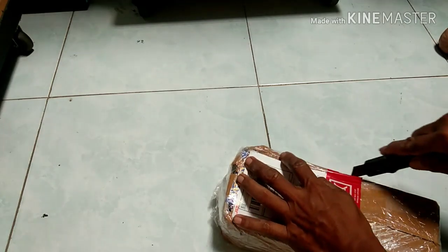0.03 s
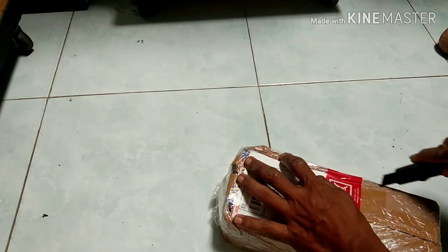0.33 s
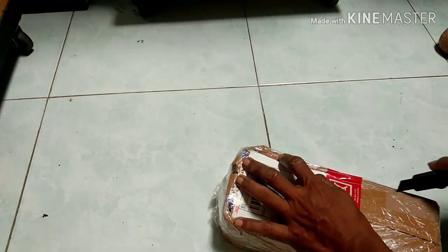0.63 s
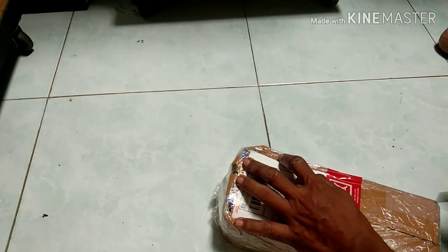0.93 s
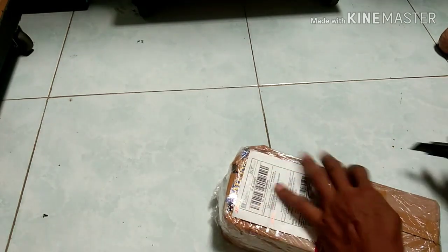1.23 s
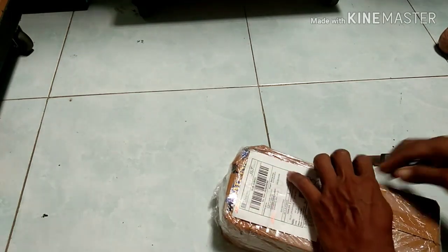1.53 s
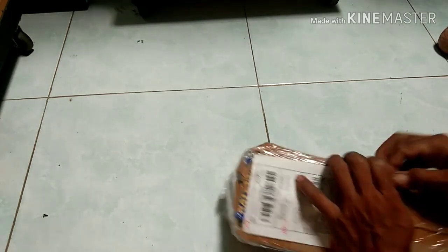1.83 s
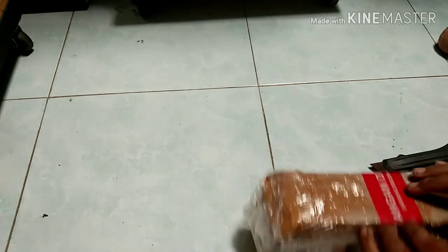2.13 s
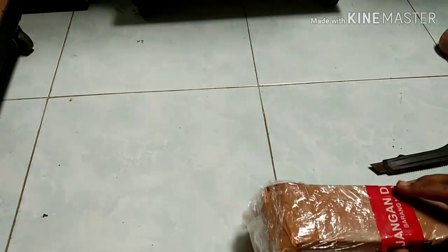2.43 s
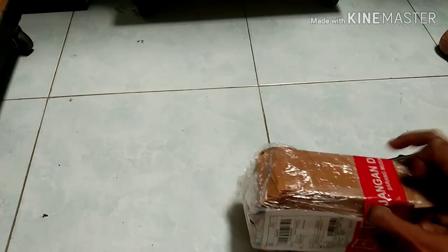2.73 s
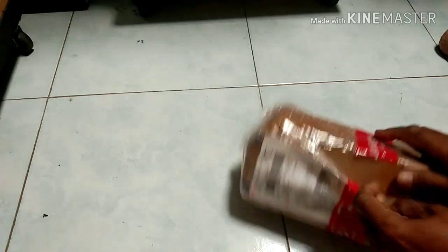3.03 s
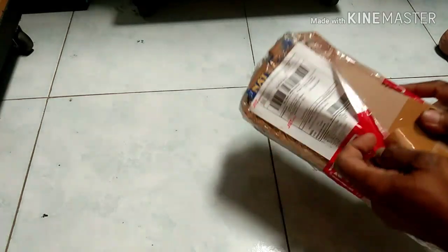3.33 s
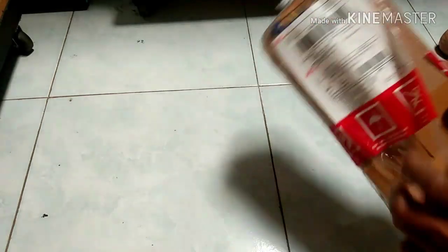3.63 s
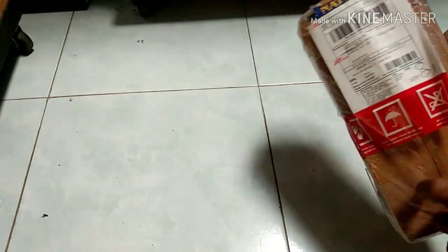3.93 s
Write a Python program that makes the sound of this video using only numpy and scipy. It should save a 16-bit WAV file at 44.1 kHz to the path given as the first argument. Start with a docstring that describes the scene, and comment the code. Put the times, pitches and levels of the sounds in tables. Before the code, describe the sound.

A parcel's plastic wrap crinkles, close up in a small hard room over a faint hum. For the first second a cutter's slider ratchets in quick clicks; at 1.4 seconds the cutter drops and rattles on tiles. Scattered crinkles start at 1.7, with one dull knock of the box at 2.15 and soft bumps. The film crackles loudest from 3 to 3.4, then rasps briefly near 3.7.

```python
"""A snap-off cutter's slider ratchets over its notches for a second, then the cutter is dropped and
rattles on a tiled floor. A cardboard parcel in taut plastic film is tipped over and knocks on the tiles
just after two seconds. It is picked up, and the film snaps and crinkles under the fingers, with one
short rasp near the end. All of it is close to the microphone in a small hard room, over a low hum,
with a limiter on the sharpest peaks."""
import sys
import numpy as np
from scipy import signal
from scipy.fft import rfft, irfft, next_fast_len
from scipy.io import wavfile
from scipy.ndimage import uniform_filter1d, minimum_filter1d, map_coordinates

SR = 44100
rng = np.random.default_rng(int(sys.argv[2]) if len(sys.argv) > 2 else 0)


def generate_wav(signal):
    """Clip the signal to [-1, 1] and save it as 16-bit WAV at the path in sys.argv[1]."""
    frames = np.transpose(np.atleast_2d(signal))
    scaled = np.clip(frames, -1, 1) * 32767
    pcm = np.round(scaled).astype(np.int16)
    wavfile.write(sys.argv[1], SR, pcm)


N = 176400
T = np.arange(4096) / SR  # time within one short burst [s]
LEVEL_WINDOW_S = .005  # a hit's level is its energy spread over this time


# the cutter's hits on the tiles: (time [s], clack level [dB], knock level [dB], length [s])
BOUNCES = [(1.3915, -10.5, -21, 0.005), (1.4027, -8.5, -29.5, .014), (1.499, -17.5, -32.5, 0.012),
           (1.5222, -19, -42, 0.018), (1.5628, -15.5, -38, 0.0076), (1.5713, -23.5, -36, 0.019),
           (1.6005, -18, -35, 0.026), (1.648, -47, -64, 0.0036), (1.662, -31.5, -55, 0.033)]
# EQ of the bright clack and of the duller knock under it: (frequency [Hz], gain [dB])
CLACK_EQ = [(700, -46), (1500, -11), (2300, 1.5), (3200, 0), (4400, 2.5), (6200, 0), (7500, -4),
            (9000, -22.5), (12000, -34), (15000, -48)]
KNOCK_EQ = [(80, -32), (250, -18), (500, -2.5), (900, -12), (1400, 0), (2200, 2), (4000, -12)]
# the cutter's ringing modes: (frequency [Hz], level [dB], decay t60 [s])
CUTTER_MODES = [(1620, -10, .06), (2345, -1, 0.12), (2960, -10, .1), (4040, 10, 0.054), (4610, 4, 0.087),
                (6100, 1, 0.14)]

def dropped_cutter(knock_db=-1, ring_db=-12, brighter=0.6, hold=0.14):
    """The cutter lands on both ends and rattles to rest; harder hits are brighter."""
    out = np.zeros(N)
    mean_db = np.mean([row[1] for row in BOUNCES])
    t = np.arange(SR // 4) / SR
    for s, db, low_db, length in BOUNCES:
        tilt = brighter * (db - mean_db)  # dB per octave
        eq = [(hz, gain + tilt * np.log2(min(hz, 7000) / 4000)) for hz, gain in CLACK_EQ]
        add(out, s, burst(hold_decay(length, hold), eq, db, vary_db=4.2))
        add(out, s, burst(hold_decay(length, hold), KNOCK_EQ, low_db + knock_db, vary_db=3))
        ring = np.zeros(len(t))
        for hz, gain, t60 in CUTTER_MODES:
            decay = amp(gain + rng.normal(0, 2.5) - 60 * t / t60)
            ring += decay * np.sin(2 * np.pi * hz * (1 + rng.normal(0, .012)) * t)
        add(out, s, at_level(ring, db + ring_db))
    return room(out, wet_db=-4.5)


# the film buckles: (time [s], snap level [dB], cardboard level [dB])
CREASES = [(1.6943, -33.0, -56), (1.7295, -32.5, -42), (1.7347, -27.5, -43.5), (1.7733, -19.5, -35.5),
           (1.7866, -21, -40), (1.8012, -25.0, -49), (1.8201, -23, -42.5), (1.9768, -39.5, -51),
           (2.0105, -19, -39.5), (2.0739, -40, -59), (2.1478, -28, -35.5), (2.1703, -32, -38),
           (2.2116, -37.5, -41.0), (2.4448, -41, -58), (2.4564, -34, -61), (2.5011, -28.5, -41.0),
           (2.515, -29, -44), (2.533, -22.0, -35.5), (2.542, -20.5, -34.5), (2.5538, -25, -36),
           (2.7049, -36.5, -49), (2.7255, -34.5, -43), (2.869, -43, -51), (2.9992, -26.0, -32),
           (3.0306, -29.5, -49), (3.0365, -26.5, -40), (3.047, -25.0, -35), (3.0742, -18.5, -29.5),
           (3.0802, -19.5, -26), (3.1091, -16, -22), (3.1183, -15.5, -24.5), (3.1317, -18.5, -24.5),
           (3.1717, -15.5, -28), (3.217, -15.0, -18), (3.2317, -11.5, -21.5), (3.2396, -16.5, -28),
           (3.2539, -12.5, -21.5), (3.261, -20, -23.5), (3.2682, -11, -26.0), (3.2813, -12, -22),
           (3.2961, -10.5, -19.5), (3.303, -9, -21), (3.3178, -14.5, -18), (3.3786, -24.0, -51),
           (3.3852, -26.5, -47), (3.4595, -27, -55), (3.4717, -26.0, -53), (3.5966, -24, -36),
           (3.6143, -26, -54), (3.6331, -24, -43.0), (3.6761, -19, -34), (3.7323, -47, -55),
           (3.7945, -30, -54), (3.8141, -28, -47), (3.9052, -36.5, -69), (3.984, -31.5, -55)]
# EQ of the crisp film and of the hollow cardboard: (frequency [Hz], gain [dB])
FILM_EQ = [(700, -23), (1600, -7), (2500, -5.5), (3200, -2.5), (4000, -1), (4800, 2), (5600, 1.5),
           (6400, 3.5), (7300, -5), (8400, -16.5), (12000, -29), (15000, -25)]
CARDBOARD_EQ = [(50, -24), (140, 0), (280, -1), (480, -4), (610, -3), (740, -1.5), (950, 0.5), (1200, 3.5),
                (1700, -15), (2400, -8.5), (4500, -60)]

def film_snaps(typical_s=0.0051, typical_db=-25, growth_per_db=0.015, loose_brighter=0.33, hold=.2):
    """Creases pop and jolt the cardboard; loose film, barely touching the box, sounds brighter."""
    out, send = np.zeros(N), np.zeros(N)
    transient = 1 + 1.6 * np.exp(-np.abs(T - .0005) / .00015)
    for s, db, card_db in CREASES:
        length = typical_s * np.exp(growth_per_db * (db - typical_db))
        looseness_db = np.clip(db - card_db - 13, -10, 10)  # a typical snap is 13 dB over its cardboard
        tilt = loose_brighter * looseness_db  # dB per octave
        eq = [(hz, gain + tilt * np.log2(min(hz, 6000) / 4000)) for hz, gain in FILM_EQ]
        add(out, s, burst(hold_decay(length, hold) * transient, eq, db, vary_db=2.5))
        add(out, s, burst(hold_decay(1.5 * length, hold), CARDBOARD_EQ, card_db, vary_db=1.5))
        add(send, s, burst(T == 0, eq, db - 4))  # a click thrown all round, heard only as reverb
    return room(out, wet_db=-8.5) + room(send, wet_db=-6) - send


# the slider's notches: (time [s], click level [dB], thump level [dB], scrape length [s])
NOTCHES = [(0.025, -29.5, -30.5, 0.0043), (0.0703, -31, -23.5, 0.0026), (0.1133, -28.0, -20.5, 0.0029),
           (0.1747, -31.5, -33.5, 0.0022), (0.2253, -26.5, -32, 0.0024), (0.268, -32.5, -36.0, 0.0032),
           (0.3336, -37, -40, 0.0058), (0.3554, -31, -36.0, 0.0044), (0.3975, -31.5, -37.0, 0.0027),
           (0.4419, -37.5, -40.5, 0.0022), (0.478, -32, -33.5, 0.0022), (0.525, -30, -29.5, 0.0035),
           (0.6527, -32.5, -29.0, 0.0018), (0.6887, -37, -67, 0.0015), (0.7323, -32.5, -38, 0.0026),
           (0.7812, -29.5, -32.5, 0.0011), (0.8173, -30, -28.5, 0.0027), (0.8497, -30, -27.5, 0.0016),
           (0.8745, -30.5, -39, 0.0047), (0.9097, -29, -36.0, 0.0035), (0.9453, -28, -37.5, 0.00088),
           (0.977, -31.0, -40, 0.0061), (1.0147, -27, -37, 0.0045)]
# EQ of a notch click: (frequency [Hz], gain [dB])
NOTCH_EQ = [(300, -5.5), (700, -5.5), (1000, -7), (1400, -3.5), (2200, -7.5), (3300, -5.5), (4600, -2),
            (6100, 1), (7200, -1.5), (8300, -15), (10500, -22), (12500, -30), (15000, -19)]
# the plastic handle's modes: (frequency [Hz], level [dB], decay t60 [s])
HANDLE_MODES = [(217, 2.5, 0.039), (297.5, 2.5, .028)]
# the slider catches and its spring ticks: (time [s], level [dB])
CATCHES = [(0.1124, -28.5), (.1738, -30.5), (0.2229, -20.5), (.651, -34.5), (0.7782, -34.5), (0.9434, -36)]
# EQ of the steel spring: (frequency [Hz], gain [dB])
SPRING_EQ = [(500, -22), (1400, -15), (3000, -19), (4600, -6), (5200, -2), (6000, 6.5), (6700, -4),
             (7500, -15), (8400, -27.5), (12000, -41), (15000, -25)]

def slider(thump_db=5, tail_db=-15, tail_t60=0.11, attack_s=0.0019, lead_s=.01):
    """The spring scrapes up each notch and snaps in; the plastic handle thumps."""
    out = np.zeros(N)
    since_snap = T - lead_s
    tail = amp(tail_db - 60 * np.abs(since_snap) / tail_t60) * (since_snap > 0)
    for s, db, low_db, length in NOTCHES:
        width = length * np.where(since_snap < 0, 0.71, 1)  # rises faster than it falls
        scrape = np.exp(-np.abs(since_snap) / width)
        add(out, s - lead_s, burst(scrape + tail, NOTCH_EQ, db, vary_db=1.86))
        ring = np.zeros(len(T))
        for hz, gain, t60 in HANDLE_MODES:
            ring += amp(gain - 60 * T / t60) * np.sin(2 * np.pi * hz * (1 + rng.normal(0, 0.056)) * T)
        add(out, s, -amp(low_db + thump_db) * ring * (1 - np.exp(-T / attack_s)))
    for s, db in CATCHES:
        add(out, s, burst(hold_decay(0.0042, hold=.4), SPRING_EQ, db, vary_db=2.5))
    return room(out, wet_db=-10)


# soft bumps of hand and box: (time [s], level [dB])
BUMPS = [(1.403, -34), (2.013, -36.5), (2.451, -34.5), (2.621, -33), (2.712, -33), (2.753, -35.5)]
# EQ of a muffled bump: (frequency [Hz], gain [dB])
BUMP_EQ = [(30, -23), (90, -7), (160, -4), (320, -7.5), (500, -13), (1200, -25.5), (3000, -45)]

def box_knocks(tip_s=2.1486, tip_db=-4.5, tip_hz=480, width_s=0.00085):
    """The box tips onto the tiles with one dead knock; handling adds soft bumps."""
    since_tip = np.arange(N) / SR - tip_s
    pulse = np.exp(-np.minimum((since_tip / width_s) ** 2 / 2, 50))
    out = -amp(tip_db) * pulse * np.sin(2 * np.pi * tip_hz * since_tip + 0.33)
    bump_envelope = amp(-60 * T / 0.06) * (1 - np.exp(-T / 0.0027))
    for s, db in BUMPS:
        add(out, s, burst(bump_envelope, BUMP_EQ, db))
    return room(out, wet_db=-11.5)


# fader ride of the film's fine crinkle: (time [s], level [dB])
CRINKLE_FADER = [(0, -40.5), (.3, -62), (.6, -62.5), (.9, -52), (1.17, -51), (1.35, -61.5), (1.72, -46),
                 (1.9, -49.5), (2.2, -43), (2.38, -46), (2.46, -38.5), (2.56, -54), (2.63, -51),
                 (2.72, -41.5), (2.82, -51), (2.871, -42), (2.98, -41.5), (3.1, -45), (3.2, -36),
                 (3.3, -24), (3.39, -30), (3.54, -44), (3.62, -26), (3.77, -32.5), (3.86, -51.5),
                 (4, -41.5)]

def crinkle(ticks_per_s=420, spread_db=5, grain_t60=0.011, card_db=-11, trim_db=-2):
    """Many tiny creases tick as the hands work the film."""
    onsets = rng.random(N) < ticks_per_s / SR
    ticks = onsets * amp(spread_db * np.minimum(rng.exponential(size=N), 3.5))
    grains = signal.fftconvolve(ticks, amp(-60 * T / grain_t60))[:N] * rng.choice([-1., 1.], N)
    film = unit(colour(grains, FILM_EQ))
    cardboard = amp(card_db) * unit(colour(grains, CARDBOARD_EQ))
    fader_db = np.interp(np.arange(N) / SR, *np.transpose(CRINKLE_FADER))
    return room((film + cardboard) * amp(fader_db + trim_db), wet_db=-3.5)


# a finger slips on the film: (time [s], length [s], level [dB])
SLIPS = [(3.676, 0.03, -23)]
# peaky EQ of the rasp: (frequency [Hz], gain [dB])
SLIP_EQ = [(150, -28), (600, -10), (1100, -11.5), (1420, 7), (1800, -14.5), (2900, 2), (3300, -16),
           (3900, 1), (5100, -12), (5900, 7), (6600, 2.5), (8400, -20), (15000, -46)]

def finger_slip(grains_per_s=480, scatter_db=3, trim_db=-4, grain_t60=0.0015):
    """Skin sticks and slips on the film in a quick uneven rasp."""
    out = np.zeros(N)
    for s, length, db in SLIPS:
        for offset in np.arange(0, length, 1 / grains_per_s):
            jitter = rng.normal(0, 0.25) / grains_per_s
            grain_db = db + trim_db + rng.normal(0, scatter_db)
            add(out, s + offset + jitter, burst(amp(-60 * T / grain_t60), SLIP_EQ, grain_db))
    return room(out, wet_db=-10)


# reverb time of the small hard room: (frequency [Hz], decay t60 [s])
REVERB_T60 = [(150, 0.25), (600, 0.29), (2000, 0.33), (6000, 0.38), (9000, 0.2), (15000, 0.32)]
# EQ of the reverb: (frequency [Hz], gain [dB])
REVERB_EQ = [(100, -2.5), (600, 1), (1500, 0), (3000, -1), (6500, -1.5), (10000, 1.5)]

def room(x, wet_db, step_s=.25):
    """Dry sound plus diffuse reverb, crossfading to a fresh tail each step as things move."""
    out, t = x.copy(), np.arange(N) / SR
    for s in np.arange(0, N / SR + step_s, step_s):
        near = np.abs(t - s) < step_s
        if x[near].any():
            hz, age, noise = signal.stft(rng.standard_normal(SR // 2), SR, nperseg=256)
            decay = amp(along(REVERB_EQ, hz)[:, None] - 60 * age / along(REVERB_T60, hz)[:, None])
            attack = 1 - np.exp(-age / 0.0005)
            tail = signal.istft(noise * decay * attack, SR, nperseg=256)[1]
            send = x[near] * np.cos(np.pi / 2 * (t[near] - s) / step_s)
            add(out, t[near][0], amp(wet_db) * signal.fftconvolve(send, tail / np.linalg.norm(tail)))
    return out


# EQ of the room tone: (frequency [Hz], gain [dB])
ROOM_TONE_EQ = [(20, -28), (34, -22), (45, -9), (65, -9.5), (105, 0), (150, -7.5), (220, -8.5), (500, -11),
                (1000, -21), (2500, -22), (6500, -47), (8500, -38), (15000, -51)]
# fader ride of the thin hiss: (time [s], level [dB])
HISS_FADER = [(0, -55), (1.35, -55.5), (1.6, -81), (4, -80)]

def background(tone_db=-55, hum_hz=47, hum_db=-65.5, hiss_hz=4770, half_width_hz=240, waver_db=3.5):
    """A bed of low room tone, mechanical hum and a thin wavering hiss that drops away around 1.5 s."""
    hz, t = np.fft.rfftfreq(N, 1 / SR), np.arange(N) / SR
    hiss = irfft(rfft(rng.standard_normal(N)) / (1 + ((hz - hiss_hz) / half_width_hz) ** 2), N)
    tone = amp(tone_db) * unit(colour(rng.standard_normal(N), ROOM_TONE_EQ))
    waver = map_coordinates(rng.standard_normal(size=100), [t * 8])  # 8 random values a second
    hum = amp(hum_db) * np.sqrt(2) * np.sin(2 * np.pi * hum_hz * t + 0.36 * waver)
    hiss_db = np.interp(t, *np.transpose(HISS_FADER)) + waver_db * waver
    return tone + hum + amp(hiss_db) * unit(hiss)


def burst(envelope, eq, db, vary_db=0):
    """A short noise hit with its own envelope, EQ and level."""
    noise = envelope * rng.choice([-1., 1.], len(T))
    return at_level(colour(noise, eq, vary_db), db)


def hold_decay(length, hold):
    """Contact envelope: hold for a share of the length, then fall 30 dB in length seconds."""
    return amp(-30 * np.maximum(T - hold * length, 0) / length)


def colour(x, eq, vary_db=0):
    """Minimum-phase EQ, with random peaks and dips scaled by vary_db."""
    size = next_fast_len(len(x) + len(T), True)
    size += size % 2
    hz = np.fft.rfftfreq(size, 1 / SR)
    ripple = map_coordinates(rng.standard_normal(size=48), [np.sqrt(hz / hz[-1]) * 47])
    cepstrum = irfft(np.log(amp(along(eq, hz) + vary_db * ripple)))
    cepstrum[1:size // 2] *= 2  # folded forward, so nothing rings ahead of a hit
    cepstrum[size // 2 + 1:] = 0
    return irfft(rfft(x, size) * np.exp(rfft(cepstrum)), size)[:len(x)]


def along(points, hz):
    """Read (frequency [Hz], value) points on a log axis."""
    frequencies, values = np.transpose(points)
    return np.interp(np.log(hz + 1), np.log(frequencies + 1), values)


def at_level(x, db):
    """Scale a hit so that its energy, spread over the level window, comes to db."""
    return amp(db) * x * np.sqrt(LEVEL_WINDOW_S * SR / np.sum(x ** 2))


def amp(db):
    """Decibels to gain."""
    return 10 ** (np.asarray(db) / 20)


def unit(x):
    """Scale to rms 1."""
    return x / np.sqrt(np.mean(x ** 2) + 1e-20)


def add(track, s, sound):
    """Mix a sound in at time s."""
    start = max(round(s * SR), 0)
    track[start:start + len(sound)] += sound[:max(N - start, 0)]


def scene(low_cut_hz=118):
    """Mono mix of cutter and parcel over the background; the foley is thinned below about 118 Hz, while the
    background keeps its low end."""
    foley = slider() + dropped_cutter() + film_snaps() + crinkle() + finger_slip() + box_knocks()
    low_cut = signal.butter(2, low_cut_hz, "high", fs=SR, output="sos")
    return (signal.sosfilt(low_cut, foley) + background())[None]


def record(dry, ceiling=0.81, high_cut_hz=15800):
    """A fast limiter holds the peaks down, then a brick-wall filter cuts the very top."""
    needed_gain = np.minimum(1, ceiling / (np.abs(dry) + 1e-9))
    limited = dry * uniform_filter1d(minimum_filter1d(needed_gain, size=41), size=41)
    size = next_fast_len(N + len(T))
    passband = np.fft.rfftfreq(size, 1 / SR) < high_cut_hz
    return irfft(rfft(limited, size) * passband, size)[..., :N]


dry = scene()
out = record(dry)
generate_wav(out)
```